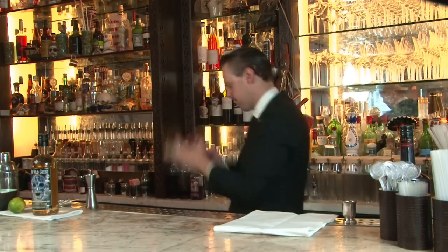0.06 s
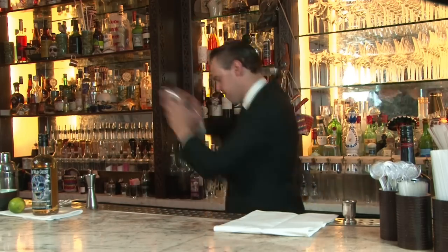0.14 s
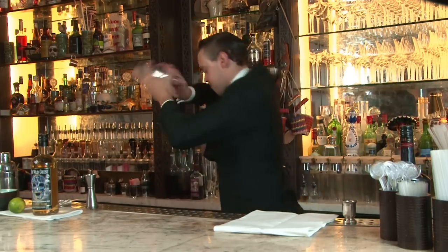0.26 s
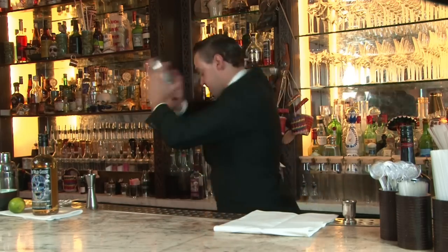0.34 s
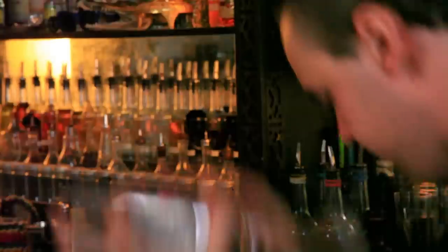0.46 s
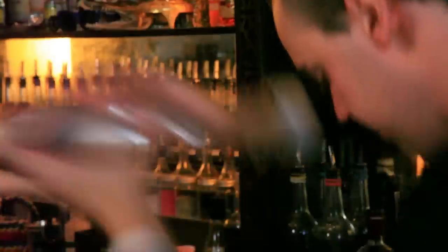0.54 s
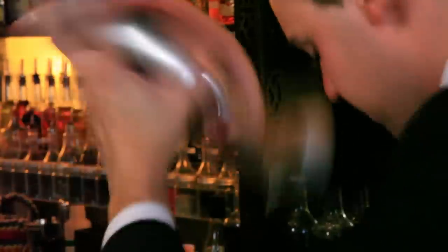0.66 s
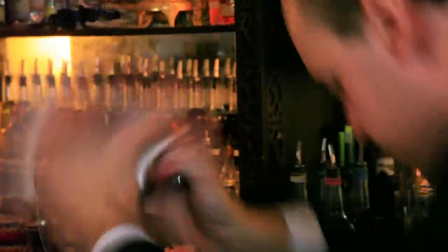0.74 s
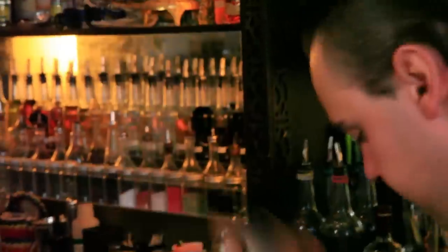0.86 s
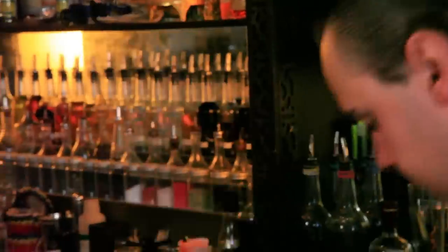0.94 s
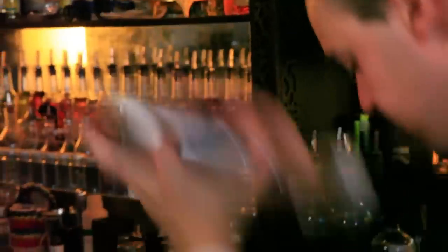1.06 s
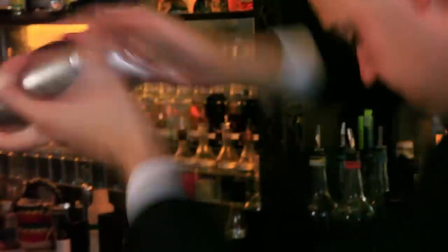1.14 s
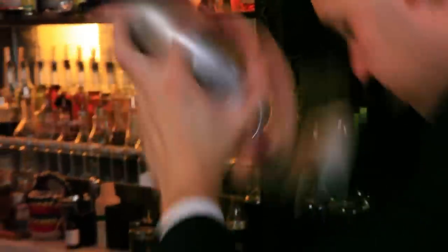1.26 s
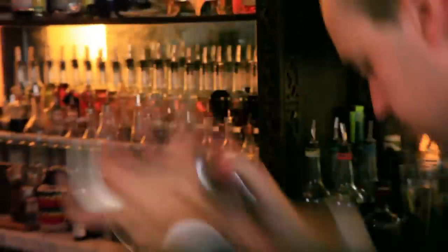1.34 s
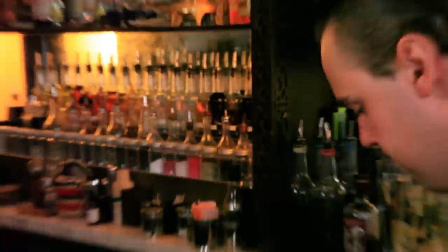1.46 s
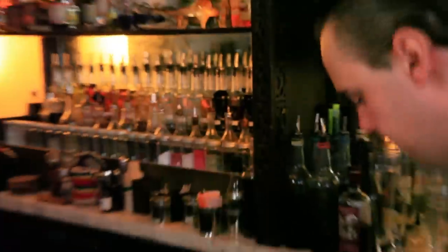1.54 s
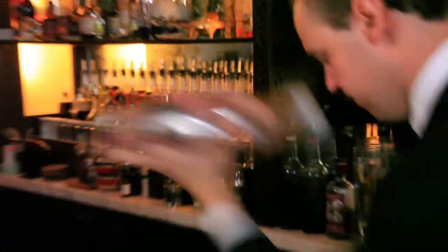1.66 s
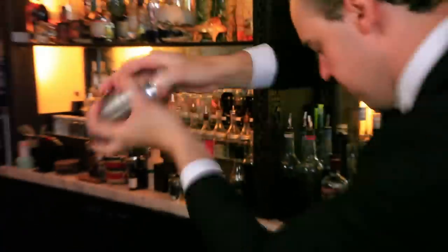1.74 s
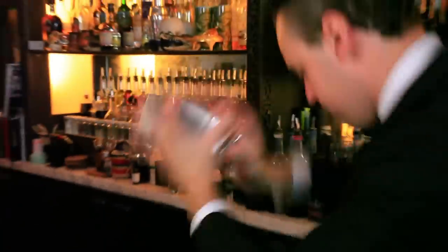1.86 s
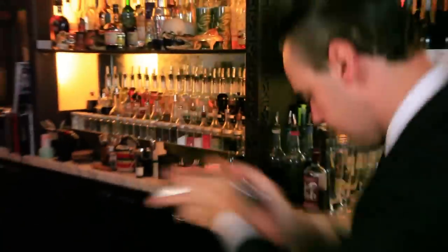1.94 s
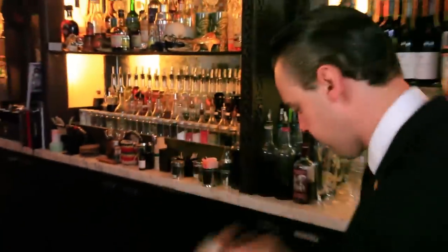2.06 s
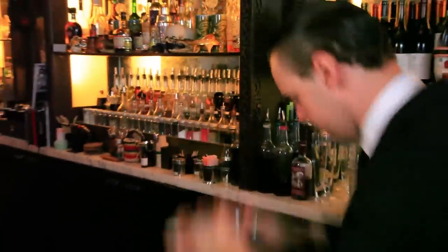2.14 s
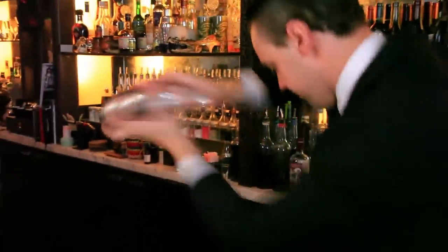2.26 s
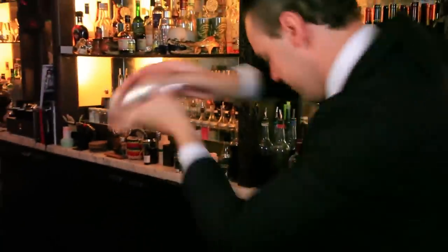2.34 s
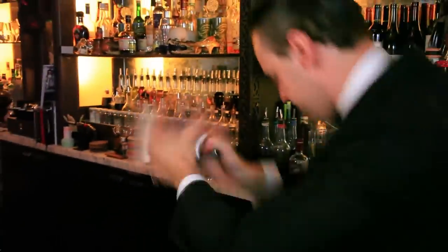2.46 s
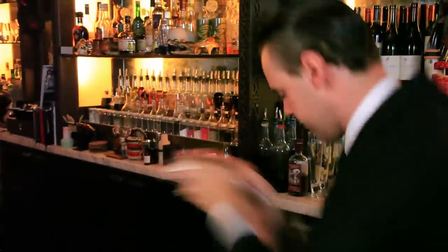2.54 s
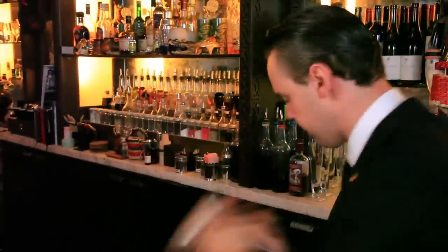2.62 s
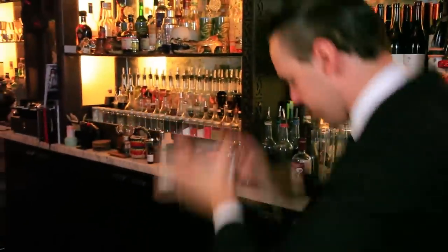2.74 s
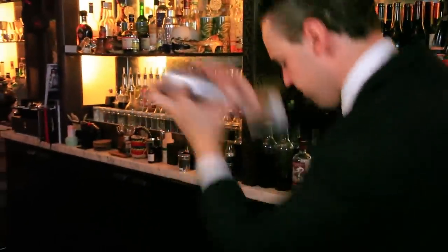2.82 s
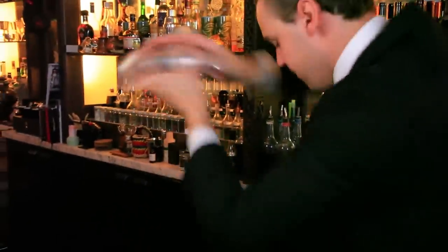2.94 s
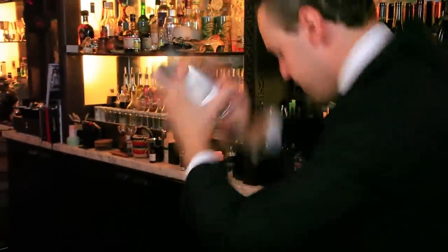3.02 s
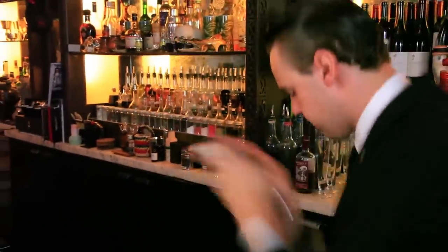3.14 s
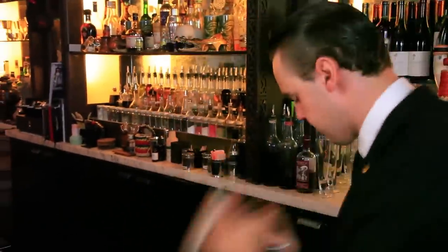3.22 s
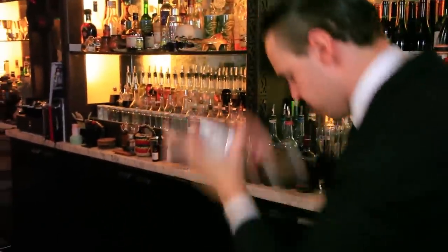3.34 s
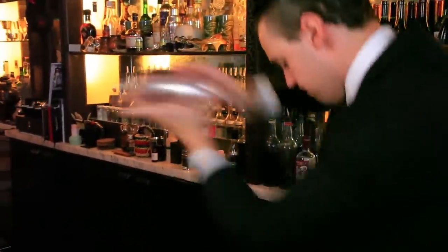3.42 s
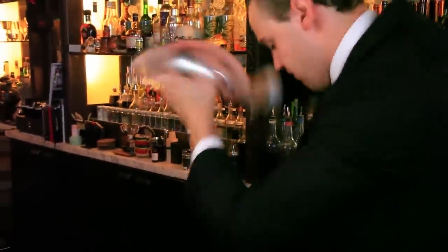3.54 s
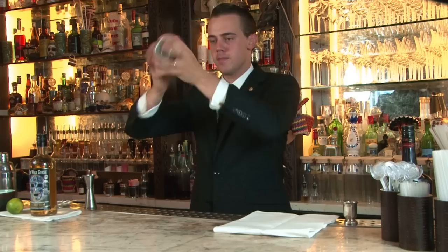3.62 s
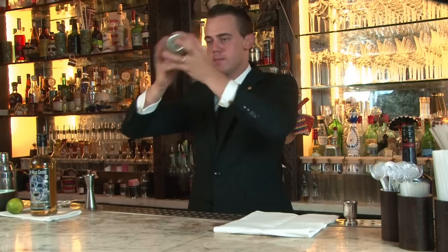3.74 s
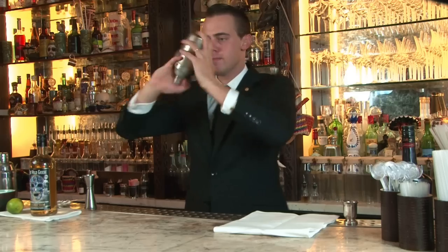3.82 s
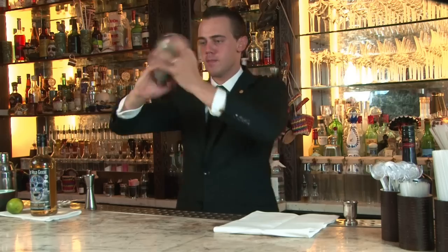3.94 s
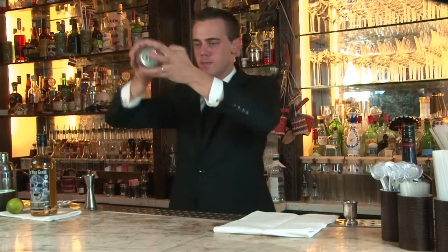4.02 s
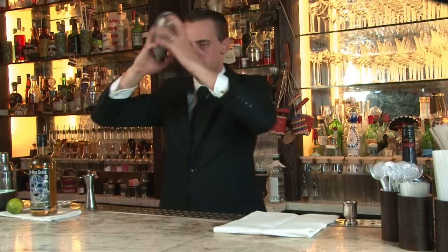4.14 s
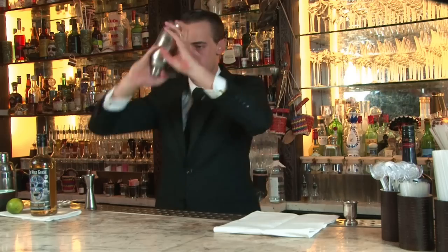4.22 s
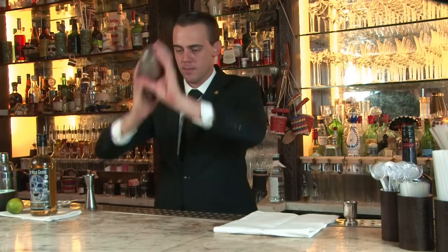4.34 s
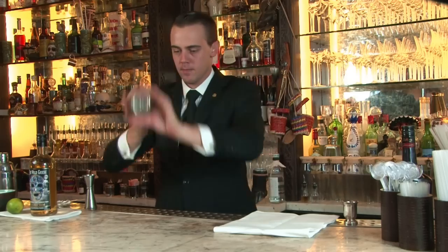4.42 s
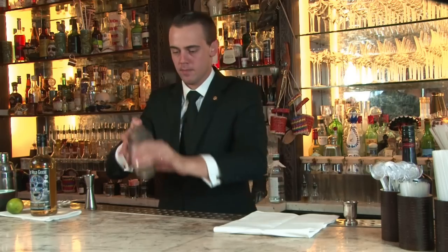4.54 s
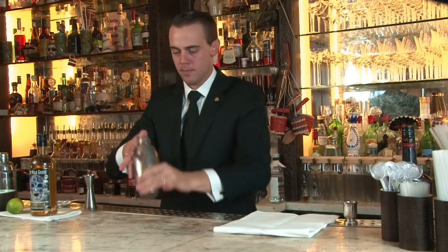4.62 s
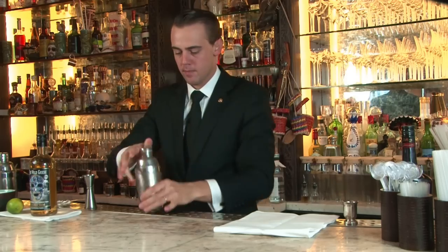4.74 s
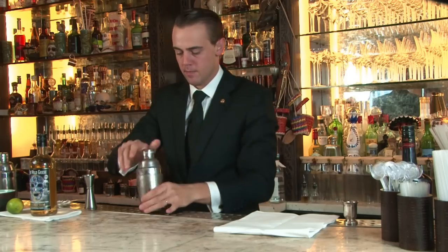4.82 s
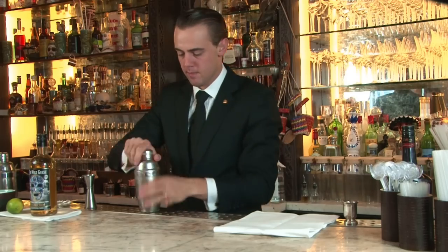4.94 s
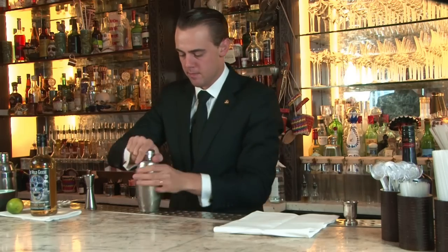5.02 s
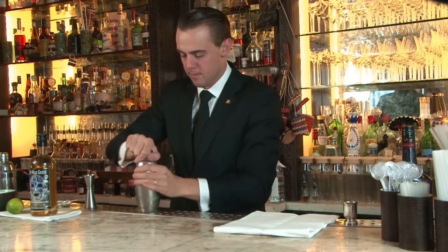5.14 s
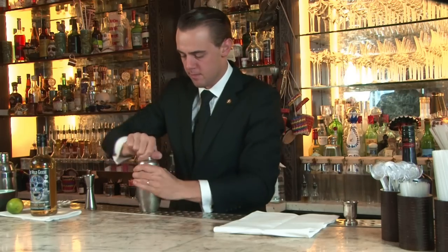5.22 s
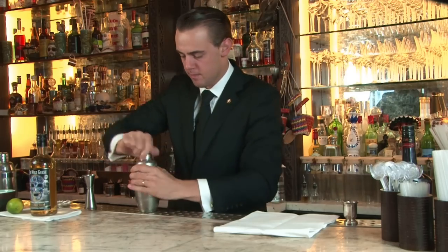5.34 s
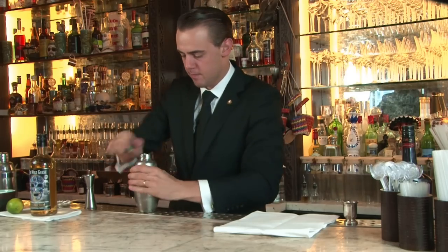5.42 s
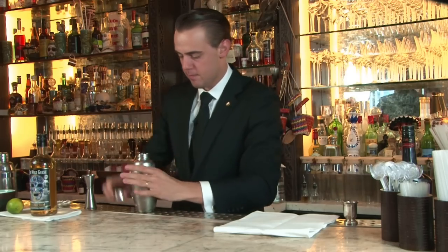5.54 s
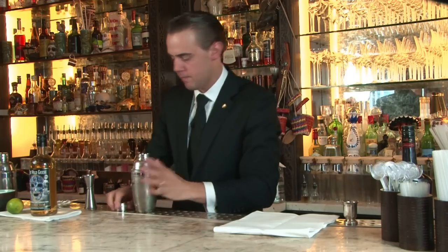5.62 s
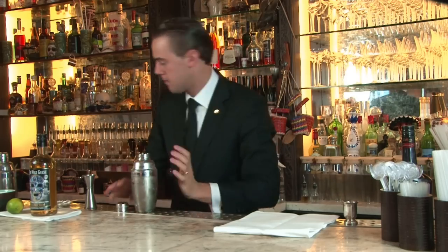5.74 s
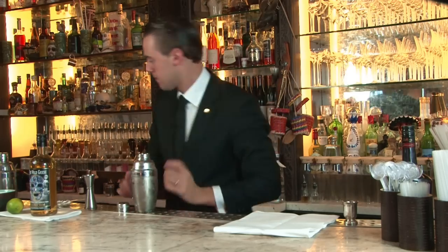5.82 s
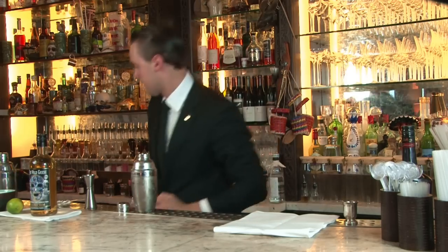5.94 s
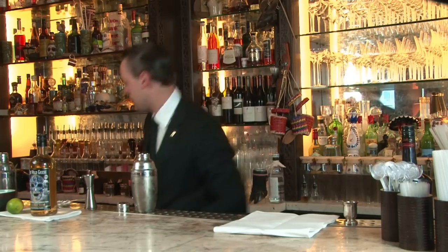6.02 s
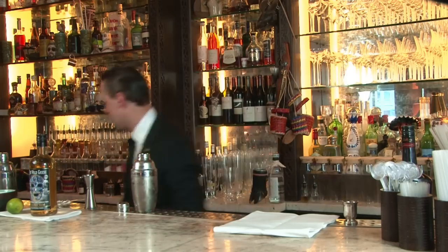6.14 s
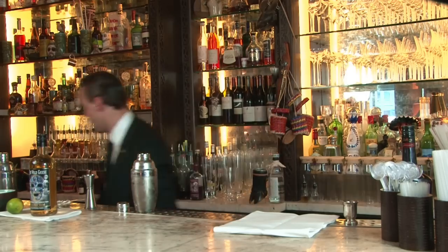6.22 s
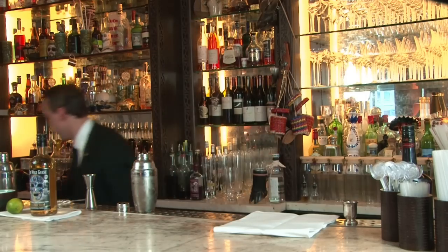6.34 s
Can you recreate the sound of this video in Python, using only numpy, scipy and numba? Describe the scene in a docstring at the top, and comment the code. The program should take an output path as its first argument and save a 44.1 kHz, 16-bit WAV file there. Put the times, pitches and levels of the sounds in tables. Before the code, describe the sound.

Ice cubes and one heavy chunk rattle hard inside a metal cocktail shaker, which is then set on a stone bar and uncapped.

```python
"""Ice is shaken hard in a steel shaker: cubes and a big chunk knock on its base, wall and cap over a rush of chips.
Every blow wakes a crowd of short damped modes; the chips are thousands of ticks swelling and bursting at each end.
The shaker is set on a stone-topped bar, its cap is twisted off and dropped beside it, with small clinks nearby.
A hard-walled room of decaying noise rings after every blow, faint air lies below and a limiter holds the peaks."""
import sys
import numpy as np
from scipy import signal
from scipy.fft import rfft, irfft
from scipy.io import wavfile
from scipy.ndimage import uniform_filter1d, minimum_filter1d
from numba import njit

SR = 44100
rng = np.random.default_rng(int(sys.argv[2]) if len(sys.argv) > 2 else 0)


def write(x):
    x = np.atleast_2d(x).T
    wavfile.write(sys.argv[1], SR, np.round(np.clip(x, -1, 1) * 32767).astype(np.int16))


N = 281005
TOP_HZ = 15800  # steep top cut of the finished sound


def undb(db):
    """Amplitude factor of a level in dB."""
    return 10 ** (np.asarray(db) / 20)


def colour(x, points):
    """Shape a spectrum by (Hz, dB) points, joined by straight lines over log frequency."""
    hz, db = np.transpose(points)[:2]
    f = np.arange(len(x) // 2 + 1) * SR / len(x) + 1e-3  # keeps the logarithm finite at 0 Hz
    gain = undb(np.interp(np.log(f), np.log(hz), db))
    return irfft(rfft(x) * gain, len(x))


@njit
def ring(n, start, pole, size):
    """Sum of damped sines, each a turning, shrinking phasor followed until it has faded by 60 dB."""
    out = np.zeros(n)
    for k in range(len(start)):
        z, i, end = size[k], start[k], abs(size[k]) * 1e-3
        while i < n and abs(z) > end:
            out[i] += z.imag
            z *= pole[k]
            i += 1
    return out


def strike(start_s, pitch_hz, t60_s, level_db):
    """Start a damped mode at each (time, pitch, decay, level), from rest and with a random sign."""
    columns = np.broadcast_arrays(start_s, pitch_hz, t60_s, level_db)
    start_s, pitch_hz, t60_s, level_db = (np.ravel(column) for column in columns)
    pitch_hz = np.clip(pitch_hz, 20, SR * .45)
    decay = np.log(1000) / (np.maximum(t60_s, 1e-3) * SR)
    pole = np.exp(2j * np.pi * pitch_hz / SR - decay)
    size = undb(level_db) * rng.choice([-1, 1], len(start_s)) + 0j
    return ring(N, (start_s * SR).astype(np.int64), pole, size)


def cluster(start_s, level_db, centre_hz, octaves, t60_s, lasts_s=.0028, count=24):
    """Each blow lands somewhere else, so it rings another crowd of modes around the centre."""
    shape = (len(start_s), count)
    pitch_hz = centre_hz * 2 ** (octaves * rng.standard_normal(shape))
    late = rng.random(shape)  # 0 to 1 through the contact
    when_s = start_s[:, None] + np.reshape(lasts_s, (-1, 1)) * late
    mode_db = level_db[:, None] - 10 * np.log10(count) + 2.0
    mode_db = mode_db + 2.48 * rng.standard_normal(shape)
    mode_db = mode_db - 10 * late  # the contact weakens
    return strike(when_s, pitch_hz, t60_s, np.where(pitch_hz < TOP_HZ, mode_db, -200))


# How each part of the wet, hand-held shaker answers a blow, in the order body, wall, cap end, ice:
# centre_hz, spread [octaves], t60_s, gain_db
PARTS = [(485.5, 0.877, 0.018, 3), (2135, 0.334, 0.011, 0.5), (4720, 0.086, 0.0054, 2.5),
         (7420, 0.524, 0.0045, 2)]
# How long a blow keeps feeding each part: lasts_s
CONTACT_S = (.002, .0025, .003, .0035)
# Modes that one blow wakes in each part: count
MODES_RUNG = (10, 10, 5, 40)
# The whole shaker jolts in the hands: a very short click, its pitches flung across the whole range
JOLT_HZ, JOLT_OCTAVES, JOLT_T60_S, JOLT_DB = 105, 12, .001, -12


def ice():
    """Blows of ice ring the four parts of the shaker, jolt it whole and sound hollow on its flank."""
    start_s, *part_db = blows()
    out = hollow_flank()
    for level_db, count, lasts_s, part in zip(part_db, MODES_RUNG, CONTACT_S, PARTS):
        hz, octaves, t60_s, gain_db = part
        out += cluster(start_s, level_db + gain_db, hz, octaves, t60_s, lasts_s, count)
    jolt_db = part_db[0] + JOLT_DB
    return out + cluster(start_s, jolt_db, JOLT_HZ, JOLT_OCTAVES, JOLT_T60_S, count=6)


def blows():
    """Gather every blow as rows of start_s, then level_db into body, wall, cap end and ice."""
    return np.hstack([chunk(), cubes(), cracks(), rattle()])


# The big chunk thuds into the filled body: start_s, level_db
CHUNK = [(.033, -21), (.042, -16.5), (0.053, -13.5), (0.064, -7), (0.083, -6), (.144, -25), (.271, -0.5),
         (.303, -32), (0.344, -18.5), (0.484, -20.5), (.555, -17), (0.562, -9), (.656, -16.5), (.666, -8),
         (.68, -11), (0.692, -17), (.763, -22), (.796, -23), (0.905, -11), (.951, -15), (1.033, -12.5),
         (1.135, -13), (1.247, -17), (1.26, -18.5), (1.288, -17.5), (1.4, -19), (1.507, -18.5),
         (1.555, -11.5), (1.779, -13.5), (1.838, -8.5), (1.932, -22), (2.071, -15), (2.095, -5),
         (2.14, -16), (2.213, -19), (2.363, -21), (2.401, -18.5), (2.417, -20), (2.443, -10),
         (2.523, -21.5), (2.572, -24), (2.683, -9.5), (2.722, -13), (2.732, -5.5), (3.029, -15),
         (3.06, -19), (3.14, -14), (3.315, -15), (3.342, -12.5), (3.377, -16), (3.473, -25), (3.639, -9.5),
         (3.693, -9), (3.961, -16.5), (3.981, -22), (4.007, -11), (4.029, -18), (4.047, -30), (4.148, -7),
         (4.378, -21), (4.401, -18.5), (4.423, -15.5), (4.434, -18)]
CHUNK_RING_DB, CHUNK_CRACK_DB = -16.5, -13.5  # into the steel and into the ice, against the thud


def chunk():
    """A heavy piece drives the body hardest and the steel and ice less."""
    start_s, db = np.transpose(CHUNK)
    return [start_s, db, db + CHUNK_RING_DB, db + CHUNK_RING_DB, db + CHUNK_CRACK_DB]


# Cubes knock on the steel: start_s, level_db, spot [0 the wall, 1 the cap end]
CUBES = [(.084, -6.5, 0.17), (0.099, -17, .1), (0.132, -11.5, .05), (0.143, -4, 0.65), (.24, -14.5, 0.71),
         (0.249, -16, 0.83), (0.266, -12, 0.45), (0.302, -6.5, 0.99), (0.353, -17, .07), (.383, -12, .05),
         (0.457, -15, 0.73), (0.474, -17, 0.73), (0.494, -11, 0.76), (0.553, -21, .35), (.555, -15, 1),
         (0.561, 2, 0.31), (0.667, -8, 0.55), (.68, -22, .25), (0.694, 0, .95), (0.746, -15, 0.49),
         (0.765, -25, 0.44), (.826, -13, 0.94), (.887, -24, 0.8), (.904, -12, 1), (0.952, -13, .45),
         (0.99, -15, .1), (1.135, -3.5, .45), (1.248, -17, .2), (1.259, -12, 0.78), (1.287, -15, .3),
         (1.358, -15.5, 0.63), (1.38, -13, 0.59), (1.508, -14.5, .12), (1.533, -15, .2), (1.555, -11, 0.17),
         (1.562, -22, 1), (1.624, -13.5, 0.32), (1.668, -6, 0.9), (1.695, -19, 0.74), (1.84, -6.5, 0.79),
         (1.848, -11.5, 0.31), (1.921, -6, 0.76), (1.934, -16, .7), (1.953, -18, 0.51), (2.098, -12, .05),
         (2.119, -21, .1), (2.131, -7, 0.46), (2.138, -6, 0.12), (2.212, -15.5, 0.46), (2.272, -23.5, 0.12),
         (2.375, -18, 0.28), (2.445, -16, 0.086), (2.516, -13.5, 0.65), (2.537, -12, .75),
         (2.683, -24, 0.9), (2.721, -7, 0.76), (2.732, -15, .35), (2.768, -20, .5), (2.833, -14, 0.49),
         (2.845, -10, 1), (2.863, -11, 0.75), (2.988, -20.5, 0.11), (3.124, -13.5, 0.98), (3.14, 0, 0.98),
         (3.144, -4, 0.93), (3.173, -18, .4), (3.314, -9, 0.9), (3.333, -15, .95), (3.367, -20, .25),
         (3.375, -15, .1), (3.44, -19, 0.051), (3.473, -3, 0.74), (3.486, -6, 0.92), (3.647, -16, .94),
         (3.696, -15, 0.96), (3.707, -19, 0.29), (3.77, -38, 0.36), (3.792, -9.5, 0.78),
         (3.962, -17.5, 0.51), (4.006, -15, 1), (4.03, -18, 0.98), (4.146, 1.5, 0.77), (4.171, -14, .72),
         (4.517, -32, 0.28), (4.567, -35, .6), (4.59, -18.5, 0.62), (4.618, -13, 0.79), (4.629, -8, .97),
         (4.637, -20, .95), (4.653, -17.5, .3), (4.692, -24.5, 0.62)]
CUBE_THUD_DB, CUBE_CRACK_DB = -16, -36  # into the body and into the ice, against the knock


def cubes():
    """The spot of a knock shares its power between wall and cap end."""
    start_s, db, spot = np.transpose(CUBES)
    angle = np.clip(spot, .01, .99) * np.pi / 2
    wall_db = db + 20 * np.log10(np.cos(angle))
    cap_end_db = db + 20 * np.log10(np.sin(angle))
    return [start_s, db + CUBE_THUD_DB, wall_db, cap_end_db, db + CUBE_CRACK_DB]


# Ice cracks on ice: start_s, level_db
CRACKS = [(0.053, -15), (.071, -10), (0.145, -1), (0.242, -19), (.343, -19), (.355, -10), (0.487, -16),
          (0.656, -20), (0.765, -5), (1.248, -18), (1.535, -11), (1.556, -23), (1.78, -19), (1.818, -16.5),
          (2.072, -24), (2.234, -29), (2.363, -19), (2.4, -18.5), (2.444, -20), (2.681, -18), (2.99, -15),
          (3.029, -16), (3.314, -14), (3.648, -11), (3.667, -25), (3.707, -17), (3.794, -21), (3.962, -32),
          (4.294, -29), (4.327, -23), (4.339, -25), (4.379, -22), (4.4, -16), (4.478, -27), (4.59, -34)]


def cracks():
    """Ice on ice leaves body, wall and cap end silent."""
    start_s, db = np.transpose(CRACKS)
    silent = np.full((3, len(start_s)), -np.inf)
    return [start_s, *silent, db]


RATTLE_RATE = 260  # blows per s
RATTLE_SCATTER_DB = 8
# Rattle in body, wall, cap end and ice, against the rush of chips: level_db
RATTLE_DB = (-7.5, -7, -17, 2.5)


def rattle():
    """Small pieces strike at random times, as strongly as the rush of chips at that moment."""
    t, power = rush()
    last_s = CRASH[-1][0]
    start_s = np.sort(rng.random(int(RATTLE_RATE * last_s))) * last_s
    rush_db = np.interp(start_s, t, 10 * np.log10(power[0]))
    scatter_db = RATTLE_SCATTER_DB * rng.standard_normal((len(PARTS), len(start_s)))
    return [start_s, *(rush_db + np.reshape(RATTLE_DB, (-1, 1)) + scatter_db)]


# A heap of ice lands on the flank that faces the microphone: start_s, lasts_s, level_db
HOLLOW = [(.085, .015, -12), (.145, .02, -7), (0.349, 0.027, -5.5), (0.553, .02, -12.5), (0.695, .02, -13),
          (0.765, 0.022, -16), (.955, .025, -12.5), (1.029, .02, -31)]
# Its hollow ring: centre_hz, spread [octaves], t60_s
HOLLOW_RING = (1314, 0.287, 0.03)


def hollow_flank():
    """A landing heap feeds a crowd of mid-pitched modes over a longer contact."""
    start_s, lasts_s, db = np.transpose(HOLLOW)
    return cluster(start_s, db, *HOLLOW_RING, lasts_s, count=30)


# Colour of the chips: pitch_hz, relative density [dB per Hz]
CHIPS = [(35, -39), (60, -4), (248, -13), (642, -3), (976, -6.5), (1630, -9.5), (2100, -5), (3120, -8),
         (4740, -4), (5580, -7.5), (15500, -21)]
CHIP_RATE, CHIP_CYCLES, CHIP_SCATTER_DB = 12000, 5.3, 3  # ticks per s, cycles to fade by 60 dB, mean lift


def crashes():
    """Thousands of ice chips tick on the steel, a few cycles each at any pitch, piling up at each end of a stroke."""
    when, height, luck = rng.random((int(CHIP_RATE * N / SR), 3)).T
    hz = 60 * (15500 / 60) ** height
    even_db = 20 * np.log10(hz)  # equal energy per Hz before colouring
    tick_db = even_db - CHIP_SCATTER_DB * np.log(luck)
    ticks = colour(strike(when * N / SR, hz, CHIP_CYCLES / hz, tick_db), CHIPS)
    lowpass = signal.butter(2, 1500, fs=SR, output="sos")
    slosh = signal.sosfiltfilt(lowpass, ticks)
    t, powers = rush()
    out = np.zeros(N)
    for part, power in zip((ticks - slosh, slosh), powers):
        level = np.interp(np.arange(N) / SR, t, np.sqrt(power))
        out += part / np.std(part) * level
    return out


# Chips and liquid crash into an end: loudest_s, lasts_s, level_db [before CRASH_DB], shape
CRASH = [(.002, 0.13, -36.5, "burst"), (0.094, 0.039, -18.5, "swell"), (0.151, 0.018, -14.5, "burst"),
         (0.262, 0.048, -24.5, "burst"), (0.306, 0.027, -22, "burst"), (0.351, 0.03, -16, "burst"),
         (.507, 0.059, -24.5, "swell"), (.552, .036, -16.5, "burst"), (0.701, 0.037, -13, "swell"),
         (0.76, .03, -14.5, "burst"), (.806, 0.015, -20.5, "burst"), (0.882, 0.072, -23, "burst"),
         (0.974, 0.043, -22, "swell"), (1.022, 0.082, -25, "burst"), (1.081, 0.033, -25.5, "burst"),
         (1.17, 0.069, -24.5, "swell"), (1.298, 0.057, -19.5, "swell"), (1.373, 0.12, -28, "burst"),
         (1.565, 0.073, -23, "swell"), (1.647, 0.1, -27.5, "burst"), (1.849, 0.077, -23.5, "swell"),
         (1.936, 0.091, -29.5, "burst"), (2.139, 0.069, -22, "swell"), (2.242, 0.16, -33.5, "burst"),
         (2.432, 0.061, -22, "swell"), (2.537, 0.12, -29.5, "burst"), (2.688, 0.071, -27.5, "burst"),
         (2.746, 0.034, -20, "swell"), (2.848, 0.082, -27.5, "burst"), (3.005, 0.022, -26.5, "swell"),
         (3.062, 0.085, -23.5, "swell"), (3.146, 0.1, -28.5, "burst"), (3.378, 0.082, -25.5, "swell"),
         (3.472, 0.087, -26.5, "burst"), (3.662, 0.13, -26.5, "burst"), (3.806, 0.071, -27.5, "burst"),
         (4.016, 0.071, -27.5, "swell"), (4.047, 0.042, -23.5, "burst"), (4.151, 0.026, -16, "burst"),
         (4.404, 0.12, -31.5, "burst"), (4.631, 0.16, -35, "burst")]
# A swell piles up and stops short, a burst comes at once and dies away:
# rising share of the length, slosh_db, fade ahead of the first arrival [dB per s]
SHAPES = {"swell": (0.8, -3, 66), "burst": (0.3, -2.5, 1100)}
RISE_DB, FALL_DB, CRASH_DB = 11.5, 11.5, -3  # climb to the peak, drop to the end, level of all crashes
TRICKLE_DB, TRICKLE_S = -23, .14  # stray chips: level and time constant


def rush():
    """Power of chips and slosh over time (1 ms steps): each crash rises and falls, then stray chips trickle."""
    t = np.arange(0, N / SR, .001)
    peak_s, lasts_s, db = np.transpose([row[:3] for row in CRASH])[:, :, None]
    share, slosh_db, early_db = np.transpose([SHAPES[row[3]] for row in CRASH])[:, :, None]
    late = (t - peak_s) / lasts_s  # in lengths of the crash, negative before the peak
    rise_db = RISE_DB * late / share
    fall_db = -FALL_DB * late / (1 - share)
    db = db + CRASH_DB + np.where(late < 0, rise_db, fall_db)
    db += np.abs(early_db) * np.minimum(late + share, 0) * lasts_s
    chip_power = np.sum(undb(db) ** 2, axis=0)
    slosh_power = np.sum(undb(db + slosh_db) ** 2, axis=0)
    power = np.array([chip_power, slosh_power])
    step = .001 / TRICKLE_S
    trickle = signal.lfilter([step], [1, step - 1], power)
    return t, np.abs(power + undb(TRICKLE_DB) ** 2 * trickle) + 1e-18


# Shaker and cap on the bar: start_s, contact lasts_s, bar_db, clack_db, clack centre_hz
SET_DOWN = [(4.913, 0.019, -19, -17, 2295), (4.935, 0.02, -28, -28.5, 1990), (5.107, 0.011, -34, -42, 1480),
            (5.178, 0.0029, -46, -29.5, 5990), (5.188, 0.02, -34, -36.5, 1780),
            (5.202, .022, -36, -41, 1800), (5.285, 0.012, -44, -48, 1760),
            (5.299, 0.026, -41.5, -43.5, 1580), (5.322, 0.046, -45, -45, 8000),
            (5.489, 0.0081, -40, -38.5, 4000), (5.508, .016, -30.5, -31.5, 2550),
            (5.593, 0.0049, -47, -59, 1200), (5.732, .03, -17, -6.5, 3630),
            (5.839, 0.016, -36.5, -19.5, 4020), (5.86, 0.053, -37, -29.5, 4440)]
# Modes of the bar: pitch_hz, level_db, t60_s
BAR = [(140, -12, .09), (250, -11, .05), (335, -7, .05), (478, -4, .07), (530, 0, .065), (575, -4, .05),
       (640, -7, .04), (760, -8, .04), (915, -12, .04), (1165, -15, .04)]
# Modes of the loose cap: pitch_hz, level_db, t60_s
CAP = [(5250, -15, .06), (6295, 0, .055), (12030, -14, .05)]
# Clack of the steel: spread [octaves], t60_s
CLACK = (1.5, 0.014)
# Tilt of the clack's treble: pitch_hz, gain_db
CLACK_TOP = [(6000, 1), (10000, 1.5), (15500, -1)]
BOUNCE_DB = -1  # each later bounce against the first touch
CAP_OFF_S, CAP_DB = 5.7, -10  # from here the loose cap itself hits the stone; its ring against the clack


def set_down():
    """Every contact is a chatter of small blows into the bar and the steel base; from 5.7 s on, the loose cap
    rings as well."""
    start_s, lasts_s, bar_db, clack_db, clack_hz = np.transpose(SET_DOWN)
    cap_db = np.where(start_s > CAP_OFF_S, clack_db + CAP_DB, -np.inf)
    octaves, t60_s = CLACK
    # a longer contact spreads its blows out, so they are lifted
    chatter_db = clack_db + 10 * np.log10(lasts_s / t60_s * 10 + 1)
    clack = cluster(start_s, chatter_db, clack_hz[:, None], octaves, t60_s, lasts_s, count=500)
    out = colour(clack, CLACK_TOP)
    turn = np.arange(4)[:, None]  # first touch and three bounces
    bounce_s = start_s[:, None, None] + lasts_s[:, None, None] * turn / 4
    for modes, blow_db, wander in ((BAR, bar_db, .018), (CAP, cap_db, .002)):
        hz, mode_db, t60_s = np.transpose(modes)
        # pitches shift a little from bounce to bounce, as the load does
        hz = hz * (1 + wander * rng.standard_normal((len(start_s), len(turn), len(hz))))
        spot_db = 2.9 * rng.standard_normal((len(start_s), 1, hz.shape[-1]))  # every contact has its own spot
        level_db = blow_db[:, None, None] + mode_db + spot_db + BOUNCE_DB * (turn > 0)
        out += strike(bounce_s, hz, t60_s, level_db)
    return out


# Small clinks and dull bumps: start_s, pitch_hz, level_db, t60_s
NEARBY = [(0.59, 76, -18, 0.091), (6.297, 10900, -46, 0.0041), (6.314, 7700, -41, 0.0082),
          (6.22, 112, -42, .1), (6.298, 95, -42, .15), (6.319, 118, -36, 0.13), (6.335, 105, -31, 0.24),
          (6.356, 4550, -21.5, 0.0071), (6.355, 12500, -46, .015), (6.365, 4450, -32, 0.014),
          (6.365, 10100, -43, 0.012)]


def nearby():
    """Each clink or bump is a single damped mode."""
    start_s, hz, db, t60_s = np.transpose(NEARBY)
    return strike(start_s, hz, t60_s, db)


# Diffuse echo by range: centre_hz, t60_s, level_db
ROOM = [(123, 0.98, -19), (570, 1, -12.5), (1900, 0.79, -13.5), (5130, 0.95, -18.5), (11900, 0.39, -10.5)]
ROOM_ONSET_S = .0081


def room(x):
    """Diffuse echo: noise that builds up in a few ms and fades at its own rate in each range."""
    t = np.arange(SR) / SR
    onset = 1 - np.exp(-(t / ROOM_ONSET_S) ** 2)
    tail = np.zeros(SR)
    for hz, t60_s, db in ROOM:
        hump = [(hz / 4, -30), (hz / 2, -3), (hz, 0), (hz * 2, -3), (hz * 4, -30)]
        band = colour(rng.standard_normal(SR), hump)
        fade = np.exp(-np.log(1000) * t / t60_s) * onset
        tail += undb(db) * band * fade / np.sqrt(np.sum(fade ** 2))
    return signal.fftconvolve(x, tail)[:N]


# Colour of the air: pitch_hz, relative density [dB per Hz]
AIR = [(18, -42), (30, -14.5), (130, 1.5), (443, -8), (767, -7.5), (852, -12.5), (6210, -30), (12300, -33),
       (15500, -42)]
AIR_DB = -51  # RMS level


def air():
    """Steady background: coloured noise at a constant level."""
    noise = colour(rng.standard_normal(N), AIR)
    return noise / np.std(noise) * undb(AIR_DB)


# Colour while the flank of the shaker faces the microphone in the first, quick strokes: pitch_hz, gain_db
FLANK = [(60, 2), (300, 2), (1250, -0.5), (2800, -1.5), (4700, 0.5), (6300, 2.5), (10000, -3.5)]
# The shaker turns away between: start_s, end_s
TURN_S = (0.57, 1.55)


def scene():
    """Shaker turning from its flank, contacts on the bar and nearby, all echoed by the room, over the air."""
    shaker = ice() + crashes()
    turned = np.interp(np.arange(N) / SR, TURN_S, (0, 1))
    shaker = turned * shaker + (1 - turned) * colour(shaker, FLANK)
    near = shaker + set_down() + nearby()
    return (near + room(near) + air())[None]


@njit
def limit(x, need, release):
    """The gain drops at once to what is needed and recovers exponentially."""
    y, g = np.empty(len(x)), 1.
    for i in range(len(x)):
        g = min(need[i], g + (1 - g) * release)
        y[i] = g * x[i]
    return y


LIMIT_DB, RELEASE_S = -12, .0013  # peak ceiling, recovery time constant


def record(dry):
    """Look-ahead peak limiter, then the steep top cut."""
    need = np.minimum(1, undb(LIMIT_DB) / (np.abs(dry[0]) + 1e-9))
    need = uniform_filter1d(minimum_filter1d(need, size=65), size=33)  # sizes in samples
    held = limit(dry[0], need, 1 / (RELEASE_S * SR))
    top_cut = signal.ellip(10, .2, 70, TOP_HZ, fs=SR, output="sos")
    return signal.sosfilt(top_cut, held)[None]


dry = scene()
out = record(dry)
write(out)
```